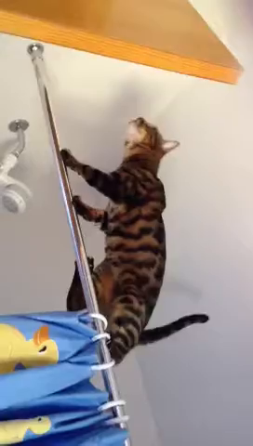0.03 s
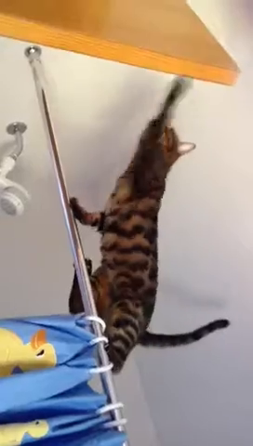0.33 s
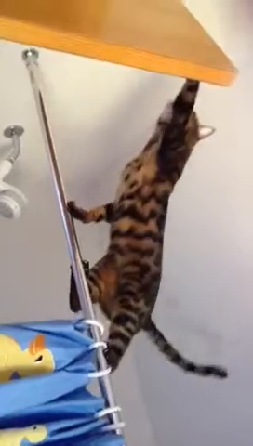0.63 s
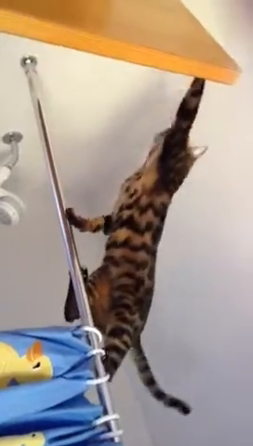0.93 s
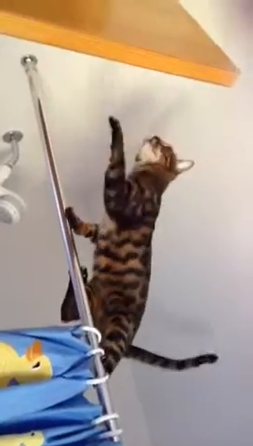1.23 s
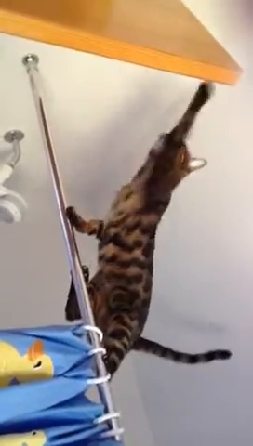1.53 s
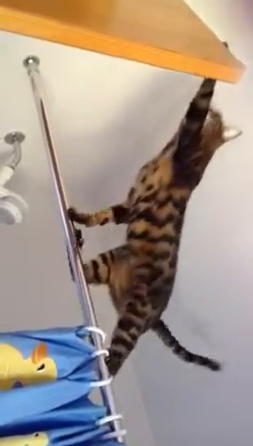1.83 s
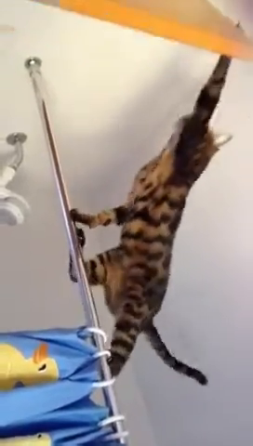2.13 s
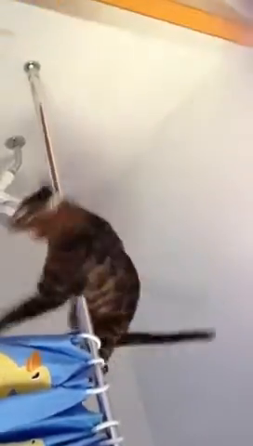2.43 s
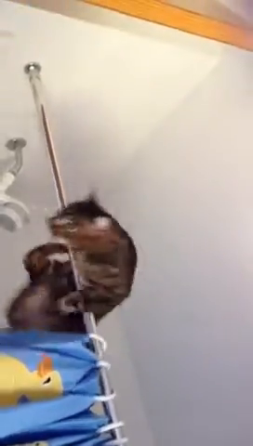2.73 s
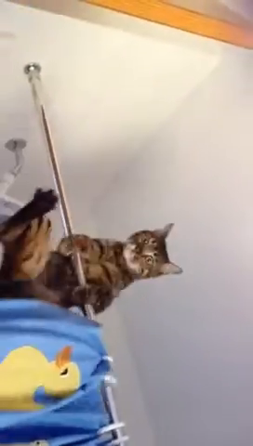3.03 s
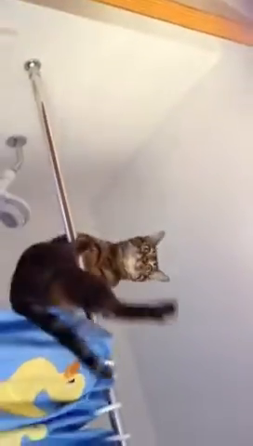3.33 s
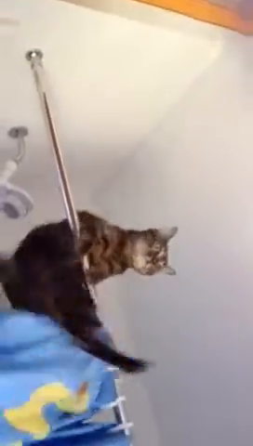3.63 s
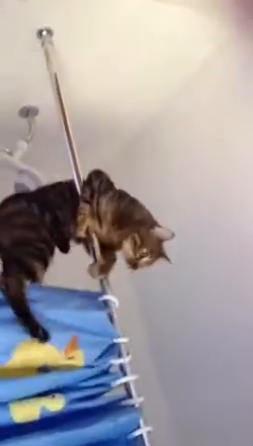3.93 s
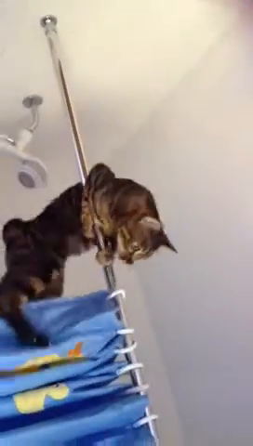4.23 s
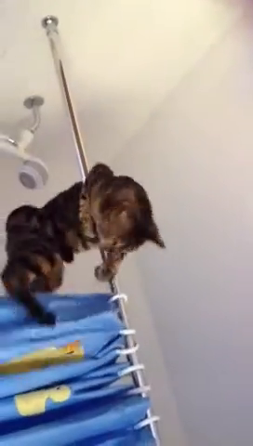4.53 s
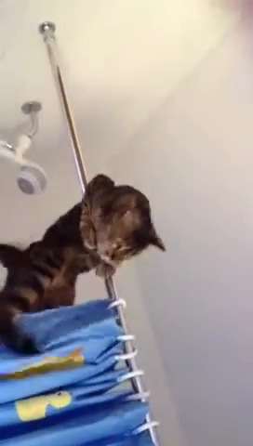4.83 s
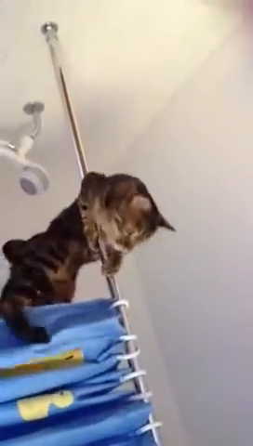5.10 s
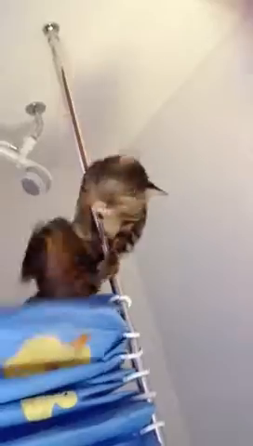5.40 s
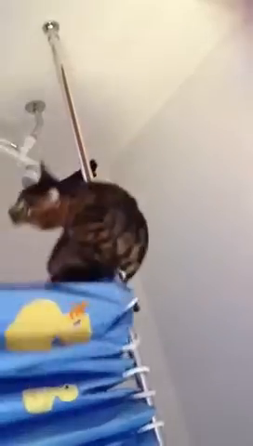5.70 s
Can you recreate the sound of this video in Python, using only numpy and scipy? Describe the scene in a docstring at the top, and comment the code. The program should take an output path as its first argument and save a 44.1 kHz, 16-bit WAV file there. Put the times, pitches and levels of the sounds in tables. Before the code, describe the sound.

A faint fan hums throughout in a small tiled bathroom with a short echo, heard from one spot by a phone below. For the first two seconds a cat makes only light claw scratches and taps on a wooden ledge, near 0.6 and 1 second, with soft paw thumps on a metal shower rod around 1.8. A scrape comes at 2.2. From 2.5 the cat scrambles: paws thump, claws clack on the tube, light rings click and the plastic curtain crackles. A sharp scrape at 3 seconds is followed by a strong burst of crackling and ring clicks at 3.6. Lighter rustling, ticks and small scrapes continue, easing around 5 seconds. From 5.4 the rustle swells with several clacks, leading to the loudest moment at 5.7, a hard bang on the rod with a thump and brief metallic ring.

```python
"""A cat balances on a metal shower curtain rod in a small tiled bathroom, pawing at a wooden ledge above.
It drops back onto the rod and scrambles: soft paws thump the bending modes, claws and rings clack on
the tube or the ledge, and the plastic curtain crackles as its folds catch and slip.
The last slip bangs the rod hard. A fan hums faintly; a phone below hears it all from one spot."""
import sys
import numpy as np
from scipy import signal
from scipy.fft import rfft, irfft
from scipy.io import wavfile

SR = 44100
rng = np.random.default_rng(int(sys.argv[2]) if len(sys.argv) > 2 else 0)


def transcribe(u):
    """Save the signal u as a 16-bit wav file named by the first command-line argument.

    u: samples, shape (n,) or (channels, n), limited to [-1, 1]; the rate is SR.
    q: integer samples, one column per channel.
    """
    v = np.clip(np.atleast_2d(u).T, -1, 1)
    q = np.round(v * 32767).astype(np.int16)
    wavfile.write(sys.argv[1], SR, q)


N = 258426
TIME = np.arange(N) / SR

# tone colour of the plastic curtain: frequency_hz, level_db
CURTAIN_SPECTRUM = [(50, -53), (140, -17), (300, -8), (850, -0.5), (1200, -3.5), (2000, 0), (3200, -8.5),
                    (4600, -2), (5200, -9), (6300, -5), (9500, -12.5), (12000, -8.5), (15000, -15)]


def amp(db):
    """Decibels to gain."""
    return 10 ** (np.asarray(db) / 20)


def unit(x):
    """Scale to an energy of one."""
    return x / np.sqrt(np.sum(x ** 2) + 1e-18)


def along(points, hz):
    """Read a curve of (frequency_hz, value) points on a log-frequency axis."""
    point_hz, value = np.transpose(points)
    return np.interp(np.log(np.maximum(hz, 1)), np.log(point_hz), value)


def response(points, tilt=0, size=4096):
    """Minimum-phase impulse response of a spectrum, tilted above 400 Hz in dB per octave."""
    hz = np.maximum(np.arange(size // 2 + 1) * SR / size, 20)
    gain = amp(along(points, hz) + tilt * np.log2(np.maximum(hz, 400)))
    cepstrum = irfft(np.log(gain))[:size // 2]
    cepstrum[0] = 0
    return unit(irfft(np.exp(rfft(2 * cepstrum, size)))[:size // 2])


def through(x, impulse):
    """Pass a sound through an impulse response."""
    return signal.fftconvolve(x, impulse)[:N]


def add(out, start_s, x):
    """Mix a sound in at its start time."""
    first = max(int(start_s * SR), 0)
    out[first:first + len(x)] += x[:N - first]


def blow(x, level_db):
    """Set a hit's level as if its energy were spread over 20 ms."""
    return unit(x) * amp(level_db) * np.sqrt(SR / 50)


def drift(points):
    """A slow random wander through evenly spaced points across the scene."""
    return np.interp(TIME, np.linspace(0, N / SR, points), rng.standard_normal(points))


def crackle(per_second, spread_db, size=SR // 8):
    """Tiny slips at random moments, most weak and a few strong; rms one."""
    chance, side = rng.random((2, size))
    hits = np.flatnonzero(chance < per_second / SR)
    strength = np.minimum(-np.log(chance[hits] * SR / per_second), 5)
    slips = np.zeros(size)
    slips[hits] = np.sign(side[hits] - .5) * amp(spread_db * strength)
    return unit(slips) * np.sqrt(size)


def stroke(slips, length_s, level_db, rise):
    """A run of slips that swells for the `rise` share of its length, then falls to silence."""
    swell = np.interp(TIME[:len(slips)] / length_s, [0, rise, 1], [0, 1, 0]) ** .5
    return amp(level_db) * unit(slips * swell) * np.sqrt(length_s * SR + SR / 100)


def room(x, direct_db, ceiling_db=-11, ceiling_s=0.005, build_s=0.00033, block=256, blocks=52):
    """Direct sound, a bounce off the ceiling, then a dense tail between the tiles, new for every spot."""
    # reverb time of the bathroom: frequency_hz, t60_s
    reverb_times = [(150, 0.33), (700, 0.39), (2000, 0.3), (5000, .3), (9000, .26), (14000, 0.17)]
    t = TIME[:block * blocks]
    t60_s = along(reverb_times, np.arange(block // 2 + 1) * SR / block)
    decay = np.exp(-np.log(1000) * t[::block, None] / t60_s)
    tail = irfft(rfft(rng.standard_normal((blocks, block))) * decay).ravel()
    impulse = unit(tail * (1 - np.exp(-t / build_s)))
    impulse[0] += amp(direct_db)
    impulse[int(ceiling_s * SR)] += amp(ceiling_db)
    return through(x, unit(impulse))


def fan(air_db=-62, waver_rad=0.34):
    """A steady rush of air with three faint, wavering tones."""
    # colour of the rushing air: frequency_hz, level_db
    air_spectrum = [(25, -59), (60, -22), (100, -23), (140, -4), (175, -3), (215, -6), (340, -3),
                    (600, -9.5), (1800, -15), (2900, -22), (4600, -24.5), (8000, -25.5), (9400, -30),
                    (15000, -29)]
    # the fan's hum: pitch_hz, level_db
    hum_tones = [(172.3, -77), (328.4, -74.5), (414.5, -77)]
    out = amp(air_db) * through(rng.standard_normal(N), response(air_spectrum))
    for pitch_hz, level_db in hum_tones:
        out += amp(level_db) * np.sqrt(2) * np.sin(2 * np.pi * pitch_hz * TIME + waver_rad * drift(40))
    return out


def curtain_rustle(attack_s=0.028, release_s=0.098, split_hz=3200, flutter_db=2, spots=3):
    """Folds all along the plastic curtain crackle as they rub, catching and letting go."""
    # shifts of the cat's body against the curtain: start_s, length_s, level_db, treble_db
    rubs = [(-.04, 0.034, -68, 7.5), (0.4, 0.19, -73.5, 3.5), (1.86, 0.87, -63.5, -3),
            (2.422, 0.22, -56, 0.5), (2.79, 0.43, -51.5, -2.5), (3.002, 0.068, -51, 6.5),
            (3.246, 0.27, -55, -3.5), (3.516, 0.086, -49.5, -4.5), (3.653, 0.31, -47, -1.5),
            (4.151, 0.18, -49, 0.5), (4.385, 0.25, -57, 2.5), (4.753, 0.12, -52, 2), (5.072, 0.068, -57, 2),
            (5.228, 0.3, -61, 3.5), (5.371, .26, -44, -2), (5.621, 0.028, -35, 4.5),
            (5.804, .025, -41, -20)]
    body_power = treble_power = 1e-12
    for start_s, length_s, level_db, treble_db in rubs:
        take_hold = np.clip((TIME - start_s) / attack_s, 0, 1)
        settle = np.exp(-np.maximum(TIME - start_s - length_s, 0) / release_s)
        power = (amp(level_db) * take_hold * settle) ** 2
        body_power += power
        treble_power += power * amp(treble_db) ** 2
    pressure = np.sqrt(body_power / spots) * amp(flutter_db * drift(300))
    folds = sum(room(crackle(800, spread_db=3.4, size=N) * pressure, direct_db=-4.5)
                for _ in range(spots))
    rustle = through(folds, response(CURTAIN_SPECTRUM))
    body = signal.sosfiltfilt(signal.butter(2, split_hz, fs=SR, output="sos"), rustle)
    return body + np.sqrt(treble_power / body_power) * (rustle - body)


def rod_ring(weight, scatter_db=2):
    """The rod rings as decaying sines; every contact point balances them a little differently."""
    # the rod's bending modes, then the ring of its tube wall: pitch_hz, level_db, t60_s
    rod_modes = [(136, -2.5, 0.75), (156, 5, 0.32), (235, -11, 0.69), (289, 15.5, 0.23), (309, 8.5, 0.99),
                 (369.5, 6.5, 0.16), (571, 7, 0.24), (792, 6, 0.18), (824, -5, 0.4), (998, 9, 0.23),
                 (2524, -21.5, 0.23), (2940, 13.5, 0.17), (4130, 2, 0.1), (4307, 2, 0.2), (4750, 9, 0.099),
                 (4660, 9, 0.25), (5940, 3, 0.15), (8183, 12, 0.28), (8660, 13, 0.17), (8930, 19, 0.23),
                 (11400, 3, 0.13), (12650, 3, 0.18)]
    pitch_hz, level_db, t60_s = np.transpose(rod_modes)
    t = TIME[:SR // 3, None]
    decay = np.exp(-np.log(1000) * t / t60_s) / np.sqrt(t60_s)  # equal energy, short or long
    partials = np.cos(2 * np.pi * pitch_hz * t) * decay
    scatter, side = rng.standard_normal((2, len(rod_modes)))
    gains = amp(level_db + scatter_db * scatter) * weight(pitch_hz) * np.sign(side)
    return unit(partials @ gains)


def sharp_clacks(ring_db=-10, chatter_db=4, chatter_s=0.0034, low_cut_hz=1800):
    """A hard contact cracks and chatters for a moment, with a quieter metallic ring."""
    # clacks of claws and rings, on the tube or the wooden ledge: start_s, level_db, tilt_db_per_octave
    clacks = [(.245, -70, 5), (1, -72, -3), (1.058, -54.5, -6), (1.777, -56.5, 8), (1.862, -53, 3.5),
              (2.48, -37.5, -4.5), (2.857, -34, 5.5), (5.511, -34.5, -2.5), (5.573, -32.5, -0.5),
              (5.681, -18, -3), (5.685, -17, 0.5), (5.705, -31, -1)]
    # colour of the crack: frequency_hz, level_db
    crack_spectrum = [(35, -54), (120, -29), (300, -8.5), (800, -13), (2500, 1.5), (3600, -4), (4600, 6),
                      (5200, -3), (6300, 0.5), (8400, -2), (10300, -1), (11700, 2.5), (15000, -5)]
    out, t = np.zeros(N), TIME[:SR // 20]
    for start_s, level_db, tilt in clacks:
        chatter = crackle(7000, spread_db=2.1, size=len(t)) * np.exp(-t / chatter_s)
        contact = amp(chatter_db) * unit(chatter)
        contact[0] += 1  # the first impact
        crack = room(through(contact, response(crack_spectrum, tilt)), direct_db=-8.5)
        ring = rod_ring(lambda hz: hz / (hz + low_cut_hz) * amp(tilt * np.log2(hz)))
        add(out, start_s, blow(crack, level_db))
        add(out, start_s, blow(ring, level_db + ring_db))
    return out


def claw_scrapes(base_hz=1796, base_db=-46.5, hz_per_db=16):
    """Claws stick and slip, rasping around one resonance; a harder scrape rasps higher."""
    # swipes over the ledge or whatever the claws catch: start_s, length_s, level_db
    swipes = [(.555, .04, -55.5), (0.972, 0.082, -54), (1.754, 0.043, -61.5), (2.186, 0.056, -45.5),
              (2.627, 0.0086, -49), (3.04, 0.026, -34.5), (3.819, 0.022, -44.5), (3.955, 0.012, -44.5),
              (4.242, 0.023, -46.5), (4.273, 0.019, -40.5), (4.553, 0.037, -52), (4.636, 0.018, -51.5),
              (4.841, 0.077, -55.5), (5.421, 0.12, -50.5)]
    # colour of the rasp: ratio_to_resonance, level_db
    rasp_spectrum = [(.04, -22), (.12, -11), (.3, -4), (.5, -2.5), (.75, 2), (1, 3), (1.35, 1), (1.8, -10),
                     (2.6, -8), (3.1, -14), (5, -19), (9, -21.5)]
    out = np.zeros(N)
    for start_s, length_s, level_db in swipes:
        resonance_hz = base_hz + hz_per_db * (level_db - base_db)
        surface = response([(ratio * resonance_hz, db) for ratio, db in rasp_spectrum])
        slips = stroke(crackle(6000, spread_db=3), length_s, level_db, rise=0.42)
        add(out, start_s, room(through(slips, surface), direct_db=-1.5))
    return out


def paw_thumps(pad_db=-3, ring_db=-3):
    """Soft pads only reach the rod's low bending modes, with a dull pat of their own."""
    # the cat's weight landing on the rod, duller for a softer paw: start_s, level_db, cutoff_hz
    landings = [(.564, -64, 75), (1.731, -52.5, 150), (1.77, -51.5, 159), (1.852, -51.5, 174),
                (2.223, -58, 110), (2.27, -57, 130), (2.484, -48.5, 340), (2.575, -52, 298),
                (2.735, -39.5, 268), (3.607, -53, 170), (3.636, -56, 350), (5.703, -30.5, 362)]
    out = np.zeros(N)
    for start_s, level_db, hz in landings:
        pat = response([(hz / 10, -55), (hz / 2, -14), (hz, 0), (hz * 2, -9), (hz * 10, -45)])
        bend = through(rod_ring(lambda mode_hz: mode_hz < 1500), pat)  # the pad's push drives the modes
        add(out, start_s, blow(bend, level_db + ring_db))
        add(out, start_s, blow(room(pat, direct_db=-1), level_db + pad_db))
    return out


def crackle_bursts():
    """Many tiny snaps crowd into a short crackling burst that swells and stops."""
    # curtain snaps, rattling rings and the lead-in to the last bang:
    # start_s, length_s, level_db, tilt_db_per_octave
    bursts = [(1.733, 0.066, -61, 0), (1.837, 0.021, -58.5, -2), (2.084, 0.074, -60, 9),
              (2.451, 0.027, -49, -3), (2.484, 0.043, -54, -3), (2.719, .055, -39, -0.05),
              (3.03, 0.031, -35, -1.5), (3.072, 0.055, -44.5, -1), (3.49, .012, -41, -3),
              (3.597, 0.026, -31.5, -2.5), (3.619, 0.042, -30, -1.15), (3.765, 0.021, -42, -1.5),
              (5.587, 0.062, -39, 5), (5.662, 0.015, -27.5, 1.5), (5.691, 0.023, -31, 5)]
    out = np.zeros(N)
    for start_s, length_s, level_db, tilt in bursts:
        snaps = stroke(crackle(4000, spread_db=2.64), length_s, level_db, rise=0.56)
        add(out, start_s, room(through(snaps, response(CURTAIN_SPECTRUM, tilt)), direct_db=-2))
    return out


def ring_clicks(rattle_s=0.00025, rattle_db=-5):
    """Light plastic rings give a short bright tick around one broad resonance."""
    # curtain rings knocking together: start_s, level_db, centre_hz, direct_to_reverb_db
    clicks = [(2.383, -58, 5230, -7), (2.714, -39.5, 5850, -16), (2.728, -38.5, 5700, -8),
              (2.745, -38.5, 7040, -7), (2.859, -39.5, 7650, -7), (3.496, -42.5, 6540, -3),
              (3.602, -31, 6050, -1), (3.609, -31.5, 5140, -9), (3.767, -42, 5400, 1),
              (3.878, -41.5, 5500, -8), (3.922, -42.5, 7640, 0), (4.184, -42.5, 5800, -6),
              (4.24, -46, 5270, -11), (4.759, -53.5, 5940, -9), (5.639, -37, 6640, -1)]
    out, t = np.zeros(N), TIME[:SR // 100]
    for start_s, level_db, hz, direct_db in clicks:
        contact = amp(rattle_db) * unit(rng.standard_normal(len(t)) * np.exp(-t / rattle_s))
        contact[0] += 1
        shell = response([(hz / 20, -22), (hz * 0.56, -12), (hz * 0.78, 0),
                          (hz * 1.22, -1), (hz * 1.12, -9), (hz * 3, -17)])
        tick = room(through(contact, shell), direct_db)
        add(out, start_s, blow(tick, level_db))
    return out


def scene():
    """The cat, the rod and the curtain over the fan, alike in both channels."""
    contacts = claw_scrapes() + paw_thumps() + sharp_clacks() + ring_clicks()
    mono = contacts + crackle_bursts() + curtain_rustle() + fan()
    return np.array([mono, mono])


def record(dry, low_cut_hz=68, peak_hz=8230, peak_q=20, peak_mix_db=-2, high_cut_hz=15400):
    """The phone thins the bass, adds a narrow treble resonance and cuts the top."""
    thin = signal.sosfilt(signal.butter(4, low_cut_hz, "high", fs=SR, output="sos"), dry)
    resonance = amp(peak_mix_db) * signal.lfilter(*signal.iirpeak(peak_hz, peak_q, fs=SR), thin)
    return signal.sosfilt(signal.ellip(12, .2, 80, high_cut_hz, fs=SR, output="sos"), thin + resonance)


dry = scene()
out = record(dry)
transcribe(out)
```